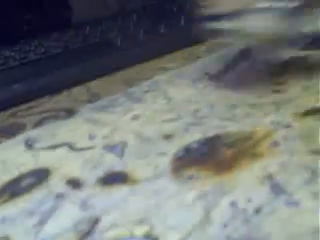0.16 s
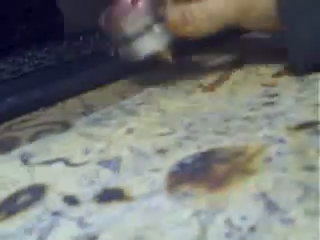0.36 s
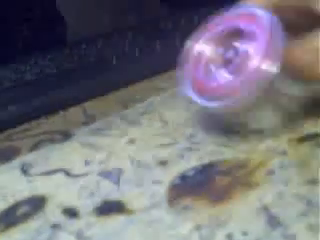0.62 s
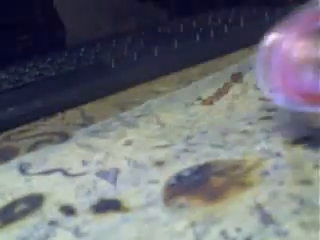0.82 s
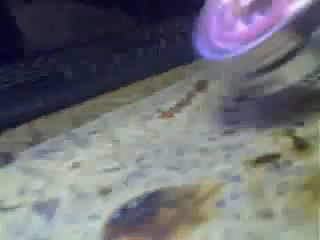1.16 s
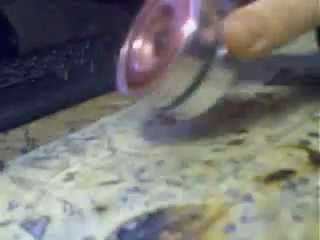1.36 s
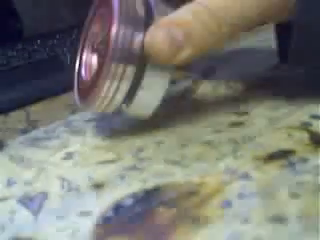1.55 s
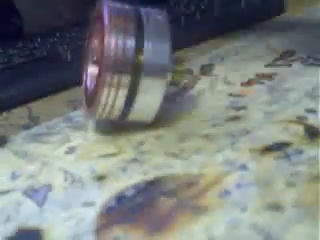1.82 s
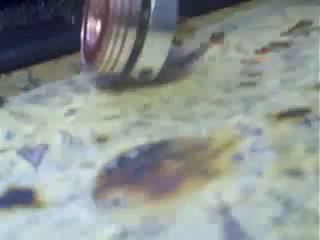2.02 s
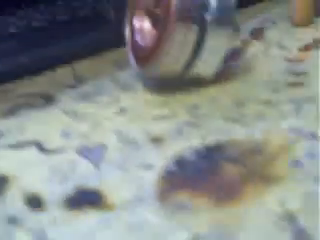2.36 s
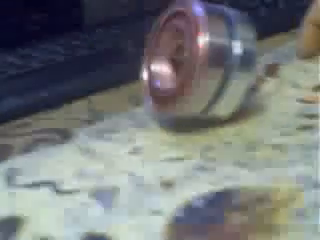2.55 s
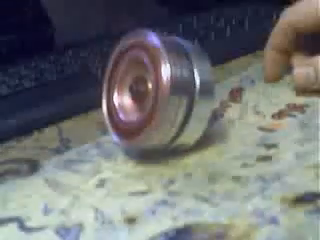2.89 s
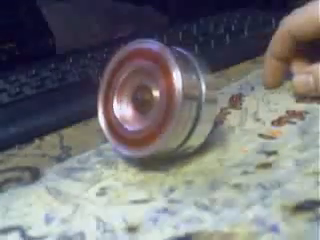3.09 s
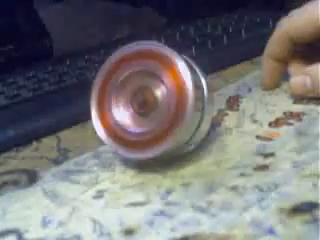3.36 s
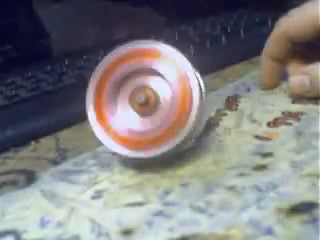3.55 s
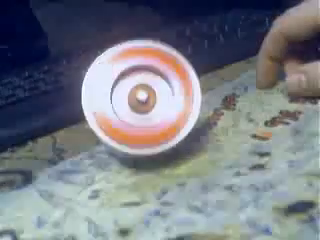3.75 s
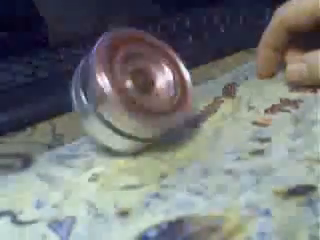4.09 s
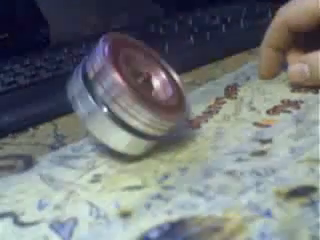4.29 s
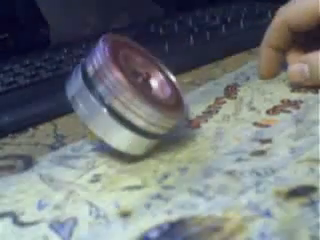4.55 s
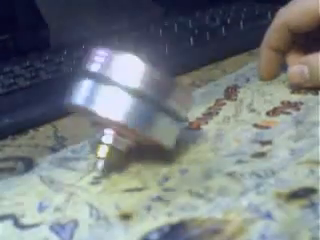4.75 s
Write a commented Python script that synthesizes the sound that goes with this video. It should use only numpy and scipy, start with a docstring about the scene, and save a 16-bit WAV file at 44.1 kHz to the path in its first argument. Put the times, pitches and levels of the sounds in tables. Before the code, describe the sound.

A loose bearing buzzes at about a hundred ticks a second inside a small metal shell on a hard countertop. The sound dulls under a grip, bursts into thuds, scraping growl and hard clacks, then brightens on release. Afterwards the standing drum rattles and whirs with irregular knocks over faint hum and hiss; sound cuts out for a quarter second late. Close, dry, rough microphone.

```python
"""On a hard countertop, close to a small microphone, a metal gyroscope drum spins.
Its loose bearing strikes once a turn and rings the shell; the rolling balls whir and sizzle above the rattle.
A hand rubs the wheel along the counter to speed it up, with thuds and clacks, then stands the drum on its rim.
The counter answers through its damped modes. Mains hum and hiss lie underneath, loud peaks overload,
and the sound cuts out once for a quarter second."""
import sys
import numpy as np
from scipy import signal
from scipy.io import wavfile
from scipy.ndimage import uniform_filter1d

SR = 44100
rng = np.random.default_rng(int(sys.argv[2]) if len(sys.argv) > 2 else 0)


def waveform_to_disk(signal):
    """Save audio, clipped to [-1, 1], as 16-bit WAV at the path in sys.argv[1]."""
    frames = np.transpose(np.atleast_2d(signal))
    scaled = np.clip(frames, -1, 1) * 32767
    samples = np.round(scaled).astype(np.int16)
    wavfile.write(sys.argv[1], SR, samples)


N = 216518
TIME = np.arange(N) / SR  # s

# speed of the rotor: time_s, speed_turns_per_s
ROTOR_SPEED = [(0, 97), (.56, 95.8), (.64, 105), (.72, 119), (.8, 129), (1.1, 125.9), (1.85, 123.4),
               (2.3, 120), (3.1, 117.1), (3.85, 114), (4.9, 111.6)]
# hardest knocks of the axle in its bearing: start_s, relative_peak_db, shell_pitch_hz
HARD_KNOCKS = [(.0965, -1.4, 2980), (.3848, -4.4, 2650), (.8706, -4.3, 2660), (.8928, .9, 2510),
               (.9655, -7.5, 2600), (1.0208, 6.8, 2720), (1.0286, .2, 2720), (1.0525, -.4, 2830),
               (1.0923, -.3, 2850), (1.1, -1.4, 2740), (1.1322, -.1, 2680), (1.22, -.4, 2710),
               (1.3082, -1.4, 2590), (1.3802, -1.5, 2550), (1.4361, -1.6, 2460), (1.5085, -6, 2610),
               (1.5486, -3.5, 2600), (1.7025, -6.5, 2570), (2.124, -4.5, 2480), (2.1898, -2.5, 2630),
               (2.2061, -4.5, 2530), (2.2814, -5.5, 2630), (3.3991, -5.3, 2710), (3.469, -5.2, 2690),
               (3.5115, -4.2, 2830), (3.6952, -4.3, 2630), (3.7821, -3.6, 2710), (3.8169, -5, 2770),
               (4.2175, -2.6, 2780), (4.297, -6.8, 2730), (4.8583, -3.4, 2500), (4.8854, -2.3, 2500),
               (4.8948, -1.3, 2650)]
# spectrum of the balls whirring in their race: frequency_hz, relative_level_db
WHIR_SPECTRUM = [(3000, -32.5), (5200, -13), (5550, 4.5), (5720, 13), (5900, 2), (6250, 4), (6700, -16),
                 (8500, -40.5), (10200, -15), (12000, -55)]
# how hard the bearing rattles: time_s, level_db
RATTLE_LEVEL = [(0, -22), (.33, -27.5), (.46, -31), (.57, -28), (.66, -21.5), (.87, -20), (.97, -29),
                (1.04, -19), (1.58, -25), (2.3, -22), (3.05, -23), (3.42, -21.5), (3.92, -24.5),
                (4.68, -24), (4.9, -21)]
# ring of the shell, which shifts with the way the drum is held and leans: time_s, pitch_hz
SHELL_RING = [(0, 3000), (.46, 2380), (.8, 2575), (1.05, 2740), (1.25, 2670), (2.1, 2644), (3.1, 2786),
              (4.47, 2900), (4.66, 2426), (4.9, 2450)]
# lean of the axle away from level: time_s, lean_degrees
AXLE_LEAN = [(0, 58), (.55, 63), (1, 36), (1.55, 44), (1.85, 3.5), (3.45, -0.5), (3.9, 27), (4.55, 39),
             (4.9, 41)]

CRUISE_SPEED = 120  # turns per second, the reference speed for the whir and the sizzle
CAGE_RATIO = .226  # rounds of the ball cage per turn of the rotor

# the hand closes on the drum to speed it up, then lets go
GRIP_START_S, GRIP_CLOSE_S = 0.15, 0.45  # start and length of the closing
GRIP_END_S, GRIP_OPEN_S = 1, 0.26  # end and length of the opening
GRIP_DB = -14  # full muffling of the treble


def amp(db):
    """Logarithmic level law: turns decibels into an amplitude ratio."""
    return 10 ** (np.asarray(db) / 20)


def evened(x):
    """Power normalization: scales a signal to an rms of one."""
    return x / np.sqrt(np.mean(x ** 2) + 1e-20)


def steady(x, size=5000):
    """Automatic normalization: evens the running rms over size samples and keeps the faster grain."""
    return x / np.sqrt(abs(uniform_filter1d(x ** 2, size)) + 1e-12)


def curve(rows):
    """Linear interpolation: joins the points of a table by straight lines in time."""
    return np.interp(TIME, *np.transpose(rows))


def ramp(start_s, length_s):
    """Linear onset: rises from zero to one over a given length."""
    return np.clip((TIME - start_s) / length_s, 0, 1)


def wander(size):
    """Low-passed noise: a random drift of rms one that changes over about size samples."""
    smooth = uniform_filter1d(rng.standard_normal(N), size)
    return evened(uniform_filter1d(smooth, size))


def add(mix, s, sound):
    """Superposition: adds a sound into the mix, in place, from a time in seconds."""
    part = mix[max(round(s * SR), 0):][:len(sound)]
    part += sound[:len(part)]


def colour(x, points, size=2048):
    """Minimum-phase filtering: gives a signal a spectrum without sounding ahead of it."""
    hz, db = np.transpose(points)
    bin_hz = abs(np.fft.fftfreq(size, 1 / SR))
    bin_db = np.interp(np.log(bin_hz + 1), np.log(hz), db)
    # the phase is the Hilbert transform of the log gain
    log_spectrum = signal.hilbert(np.log(amp(bin_db))).conj()
    taps = np.fft.ifft(np.exp(log_spectrum)).real
    return signal.oaconvolve(x, taps[:size // 2])[:len(x)]


def resonate(x, hz, width_hz):
    """Damped resonance: shifts the signal down by a pitch or pitch curve, smooths it and shifts it back."""
    turn = np.exp(2j * np.pi * np.cumsum(hz * np.ones(len(x))) / SR)
    decay = np.exp(-np.pi * width_hz / SR)
    envelope = signal.lfilter([1 - decay], [1, -decay], x / turn + 1e-18)
    return 2 * (turn * envelope).real


def turns():
    """Rotational kinematics: the angle of the rotor in turns is the integral of its speed."""
    return np.cumsum(curve(ROTOR_SPEED)) / SR


def cage():
    """Epicyclic motion: swings between -1 and 1 as the slower ball cage goes round."""
    return np.cos(2 * np.pi * CAGE_RATIO * turns())


def free_turns(knocked):
    """Impact timing: samples at which a turn starts, without the turns whose strike is a knock."""
    at = np.flatnonzero(np.diff(np.floor(turns())))
    nearest_knock_s = abs(at[:, None] / SR - np.array(knocked)[:, 0]).min(axis=1)
    half_turn_s = .5 / curve(ROTOR_SPEED)[at]
    return at[nearest_knock_s > half_turn_s]


def strikes(knocked, jitter_s=.0006, force_db=4, cage_db=3):
    """Imbalance excitation: the rotor strikes its bearing once a turn, with a force that follows the cage."""
    at = free_turns(knocked)
    late, force = np.clip(rng.standard_normal((N, 2))[at], -2, 1.1).T
    shifted = at + (late * jitter_s * SR).astype(int)
    hits = np.zeros(N)
    hits[np.clip(shifted, 0, N - 1)] = amp(force_db * force)
    signs = rng.choice([-1, 1], N)
    return evened(hits * signs * amp(cage_db * cage()))


def chatter(per_s=1500, bunching=4.9, between=0.31):
    """Modulated shot noise: tiny impacts of the loose balls, bunched round each strike."""
    phase = 2 * np.pi * (turns() - .08)  # densest force a little after the turn starts
    swing = between + np.exp(bunching * (np.cos(phase) - 1))
    impacts = rng.uniform(-0.66, 1, N) * (rng.random(N) < per_s / SR)
    return evened(swing * impacts)


def shell(x, hz, width_hz=520):
    """Heavily damped resonance: the metal shell rings for a few cycles after each impact."""
    # spectrum of one tick in the bearing: frequency_hz, relative_level_db
    tick_spectrum = [(60, -38), (300, -36), (1000, -1.5), (1600, -1), (2150, 0), (2700, 0.5), (3300, -6),
                     (4000, -2.5), (4900, -12.5), (6200, -32), (7500, -31.5), (10000, -29.5), (12000, -41)]
    return resonate(colour(x, tick_spectrum), hz, width_hz)


def released():
    """Removal of damping: rises from zero to one as the hand lets go."""
    return ramp(GRIP_END_S - GRIP_OPEN_S, GRIP_OPEN_S)


def grip():
    """Contact damping: how firmly the hand holds the drum, 0 to 1."""
    return ramp(GRIP_START_S, GRIP_CLOSE_S) * (1 - released())


def treble_db(free_db=-6.5, jolt_db=6.5, jolt_fade_s=0.94):
    """Damping and excitation: the grip muffles the treble; the jolt of letting go sharpens it for a while."""
    jolt = released() * np.exp(-abs(TIME - GRIP_END_S) / jolt_fade_s)
    return free_db + GRIP_DB * grip() + jolt_db * jolt


def sharpen(x, split_hz=3250):
    """Shelving filter: raises or lowers the treble of the rattle over time."""
    high_pass = signal.butter(5, split_hz, "high", fs=SR, output="sos")
    treble = signal.sosfiltfilt(high_pass, x)
    return x + treble * (amp(treble_db()) - 1)


def whir_db(level_db=-50, db_per_degree=-0.2515, db_per_speed=-0.29, held_db=-9.5):
    """Rolling contact: the whir grows as the axle nears level, the rotor slows or the hand lets go."""
    over_cruise = curve(ROTOR_SPEED) - CRUISE_SPEED
    running_db = level_db + db_per_degree * curve(AXLE_LEAN) + db_per_speed * over_cruise
    return running_db + held_db * (1 - released())


def sizzle(force, flutter_db=8.5, cruise_db=-61.5, db_per_speed=1.05):
    """Sliding friction: the balls hiss finely with each strike, weaker as the rotor slows or is gripped."""
    # spectrum of the sliding balls: frequency_hz, relative_level_db
    sizzle_spectrum = [(5000, -37), (8500, -12.5), (9700, 3), (10600, 1.5), (11200, -16.5), (12000, -6.5)]
    friction = force * amp(flutter_db * wander(600)) * rng.standard_normal(N)
    level_db = cruise_db + db_per_speed * (curve(ROTOR_SPEED) - CRUISE_SPEED) + GRIP_DB * grip()
    return steady(colour(friction, sizzle_spectrum)) * amp(level_db)


def bearing(hard, fine, fine_db=13.0, contact_width_hz=1100, scatter_hz=90, flutter_db=3.5):
    """Impact excitation: strikes and ball impacts rattle the shell, and a thin whir flutters with them."""
    # every contact rings at a slightly different pitch
    hz = curve(SHELL_RING) + scatter_hz * wander(200)
    # a strike presses longer, so it swells and is purer
    rounded = evened(shell(resonate(hard, hz, contact_width_hz), hz))
    ticks = amp(fine_db) * evened(shell(fine, hz))
    rattle = steady(sharpen(rounded + ticks))
    force = np.sqrt(abs(uniform_filter1d(rattle ** 2, size=50)))
    # the narrow play of the bearing bounds the size of ordinary ticks
    rattle = rattle / (1 + (force / 3.4) ** 4) ** (1 / 4)
    rolling = force * amp(flutter_db * wander(700)) * rng.standard_normal(N)
    whir = steady(colour(rolling, WHIR_SPECTRUM))
    return rattle * amp(curve(RATTLE_LEVEL)) + whir * amp(whir_db()) + sizzle(force)


def room(x, wet_db=-10.5, t60=0.052, size=8000):
    """Early reflection: adds faint, short echoes from the things on the counter."""
    t = np.arange(size) / SR
    echoes = rng.choice([-1, 1], size) * (rng.random(size) < 2000 / SR)  # about 2000 per second
    taps = echoes * amp(-60 * t / t60) * (t > .002)
    return x + amp(wet_db) * signal.oaconvolve(x, taps / np.linalg.norm(taps))[:N]


def counter_ring(size=9000):
    """Modal superposition: the impulse response of the counter to one sharp tap."""
    # modes of the counter: frequency_hz, relative_level_db, t60_s
    counter_modes = [(101.6, -11, 0.094), (169.5, 1, 0.09), (215.2, -1.5, 0.066), (287.5, -1.5, 0.12),
                     (397.2, -2.5, 0.13), (437, -4.5, 0.096), (497, 4, 0.033), (617, -3.5, 0.1),
                     (672, 0.5, 0.081), (804.6, 2, 0.035), (948, 0, 0.018), (1149, 0.5, 0.084),
                     (1340, 5, 0.05), (1756, 2.5, 0.015), (2166, 8.5, 0.025), (2597, 17.5, 0.046)]
    t = np.arange(size) / SR
    ring = np.zeros(size)
    for k, (hz, db, t60) in enumerate(counter_modes):
        ring += (-1) ** k * amp(db - 60 * t / t60) * np.sin(2 * np.pi * hz * t)
    return ring


def soften(x, hz):
    """Contact time: a soft contact passes little above hz."""
    return signal.sosfilt(signal.butter(2, min(hz, SR / 3), fs=SR, output="sos"), x)


def race(count=14, wobble=2.25):
    """Fourier series: the uneven race repeats every turn, a faint chord of overtones split by the cage."""
    angle = 2 * np.pi * turns()
    overtones = sum(np.cos(k * angle + rng.uniform(0, 2 * np.pi)) for k in range(1, count))
    return evened(overtones * (1 + wobble * cage()))


def contact_db(held_db=-21, standing_db=-13, edge_db=6.5, edge_degrees=41.5):
    """Mechanical coupling: the standing drum gives the counter more rattle, and still more as it leans."""
    standing = ramp(1.6, 0.027)  # the set-down: start and length in s
    leaning_db = edge_db * (curve(AXLE_LEAN) / edge_degrees) ** 2
    return held_db * (1 - standing) + standing * (standing_db + leaning_db)


def rumble(hits, level_db=-3., rim_hz=1300, roll=0.93):
    """Structure-borne sound: rattle, rolling and the race's chord pass through the rim into the counter."""
    drive = evened(hits) + roll * rng.standard_normal(N)
    grain, chord = (steady(soften(signal.oaconvolve(x, counter_ring())[:N], rim_hz))
                    for x in (drive, race()))
    return (.5 * grain + chord) * amp(curve(RATTLE_LEVEL) + contact_db() + level_db)


def background(hum_db=-36.0, hiss_db=-42.0, hum_hz=60):
    """Stationary noise floor: a sine of mains hum and soft coloured hiss."""
    # spectrum of the hiss: frequency_hz, relative_level_db_per_hz
    hiss_spectrum = [(15, -21), (40, -10.5), (90, -15), (300, -2), (1000, -3.5), (3000, -8), (6000, -43.5),
                     (10000, -24.5), (12000, -70.5)]
    hum = evened(np.sin(2 * np.pi * hum_hz * TIME))
    hiss = evened(colour(rng.standard_normal(N), hiss_spectrum))
    return amp(hum_db) * hum + amp(hiss_db) * hiss


def slack_knocks(slack_chance=.55, over_db=14, spread_db=0.1, spread_hz=24):
    """Random impacts: lighter knocks on turns when the cage leaves the axle slack, rarer under the grip.

    Rows are start_s, relative_peak_db, shell_pitch_hz; the peaks follow the strength of the rattle."""
    at = free_turns(HARD_KNOCKS)
    chance = rng.random(len(at))
    force, pitch = rng.standard_normal((len(at), 2)).T
    db = curve(RATTLE_LEVEL)[at] + over_db + spread_db * force
    hz = curve(SHELL_RING)[at] + spread_hz * pitch
    slack = (cage() * (1 - grip()))[at]
    return np.transpose([at / SR, db, hz])[chance < slack_chance * slack]


def knocks(knocked, level_db=0.65, contact_width_hz=1300, size=700):
    """Cascaded resonance: each hard knock swells for a cycle or two and quickly dies."""
    out = np.zeros(N)
    signs = rng.choice([-1, 1], N)
    for (s, db, hz), sign in zip(knocked, signs):
        ring = resonate(shell(signal.unit_impulse(size), hz), hz, contact_width_hz)
        add(out, s, amp(db + level_db) * sign * ring / abs(ring).max())
    return out


def contact(x, hz, bass_share=.32):
    """Contact bandwidth: a soft contact passes little treble; a hard one is too brief to pass bass."""
    high_pass = signal.butter(2, bass_share * hz, "high", fs=SR, output="sos")
    return signal.sosfilt(high_pass, soften(x, hz))


def bumps(size=9000, push_cycles=0.89):
    """Impulse response: soft contacts thud and push the slab down; hard ones clack."""
    # bumps of the drum on the counter; each ring dies away within damping_s (fall to 1/e): start_s, peak_db,
    # contact_hardness_hz, damping_s, push_peak_db, push_hz
    drum_bumps = [(0.3826, -1, 760, 0.011, -6, 144), (0.3877, -2, 520, 0.2, 2, 430),
                  (0.8705, 1, 2400, 0.0016, -42, 121), (0.872, -16, 2400, 0.0059, -34.5, 120.5),
                  (.892, -0.5, 1680, 0.0024, -29, 120), (1.625, -7.5, 200, 0.068, -19, 138),
                  (1.633, -22, 280, .08, -16, 299), (2.122, -14.5, 454, 0.049, -25.5, 40),
                  (2.176, -20, 330, .06, -37, 48.3)]
    out, t = np.zeros(N), np.arange(size) / SR
    for s, db, hz, damping_s, push_db, push_hz in drum_bumps:
        thud = contact(counter_ring(size=size) * np.exp(-t / damping_s), hz)
        damped_push = np.sin(2 * np.pi * push_hz * t) * np.exp(-push_hz * t / push_cycles)
        sway = contact(damped_push, push_hz)
        add(out, s, amp(db) * thud / abs(thud).max() + amp(push_db) * sway / abs(sway).max())
    return out


def push(start_s, length_s, level_db, swell_db, attack_s=0.0056, release_s=0.012):
    """Normal force: the wheel's pressure on the counter sets in, swells and decays exponentially."""
    release = np.exp(-np.maximum(TIME - start_s - length_s, 0) / release_s)
    # the swell runs from -3 to -2 times swell_db about level_db
    swell = amp(level_db + swell_db * (ramp(start_s, length_s) - 3))
    return ramp(start_s, attack_s) * swell * release


def rubbing(leak=0.018, scuff_db=-11.5, catch_db=2.5, ring_db=-7, ring_width_hz=260, balls_db=-37):
    """Stick-slip friction: the wheel catches; the slab growls, the shell sings, the loaded balls whir."""
    # pushes of the wheel along the counter, the last ones scrapes as it leaves the hand:
    # start_s, length_s, relative_level_db, swell_db, growl_hz
    wheel_rubs = [(0.411, 0.26, -27.5, 2, 290), (0.622, 0.041, -18, 3.5, 380),
                  (0.688, 0.12, -12.5, 3.5, 300), (0.83, .03, -26.5, 0, 1000),
                  (0.87, 0.0064, -19.5, -3.5, 2370), (0.889, 0.0074, -16, 0, 1830),
                  (1.193, 0.042, -31.5, 2, 888)]
    # dry hiss of the rubbed wheel: frequency_hz, relative_level_db
    scuff_spectrum = [(500, -32), (1250, 13), (1700, -16), (2500, 6), (3600, -12.5), (5200, -13),
                      (6000, -16), (7000, -20.5), (9300, -20.5), (12000, -40.5)]
    friction = rng.standard_normal(N) * amp(catch_db * np.clip(wander(250), -2, 2))
    slab = signal.oaconvolve(friction, counter_ring())[:N]
    hz = curve(SHELL_RING)
    ring = steady(shell(resonate(friction, hz, ring_width_hz), hz))
    scuff = steady(colour(friction, scuff_spectrum))
    whir = steady(colour(friction, WHIR_SPECTRUM))
    metal = amp(scuff_db) * scuff + amp(ring_db) * ring + amp(balls_db) * whir
    out = np.zeros(N)
    for s, length_s, db, swell_db, growl_hz in wheel_rubs:
        growl = steady(contact(slab, growl_hz) + leak * slab, size=2000)
        out += (growl + metal) * push(s, length_s, db, swell_db)
    return out


def scene(press=1.6):
    """Superposition of sources: the drum, its counter and the noise floor."""
    knocked = np.vstack([HARD_KNOCKS, slack_knocks()])
    hard, fine, loud = strikes(knocked), chatter(), knocks(knocked)
    # a knock pins the axle and quietens the rattle
    free = 1 / (1 + abs(press * uniform_filter1d(abs(loud), size=60)))
    drum = room(free * bearing(hard, fine) + loud)
    return (drum + rumble(hard + fine) + rubbing() + bumps() + background())[None]


def record(dry, ceiling=.75, knee=14, edge_hz=11700):
    """Saturation and band limiting: rounds off loud peaks, drops out once and removes the top treble."""
    # the dropout: start_s, end_s
    dropout = (3.949, 4.1985)
    loud = dry / (1 + abs(dry / ceiling) ** knee) ** (1 / knee)
    live = (TIME < dropout[0]) | (TIME > dropout[1])
    low_pass = signal.firwin(255, edge_hz, window=("kaiser", 9), fs=SR)
    return signal.oaconvolve(loud * live, low_pass[None], "same")


dry = scene()
out = record(dry)
waveform_to_disk(out)
```